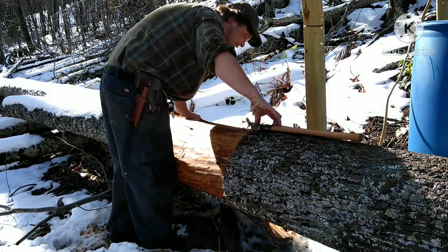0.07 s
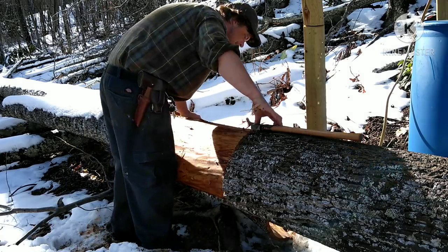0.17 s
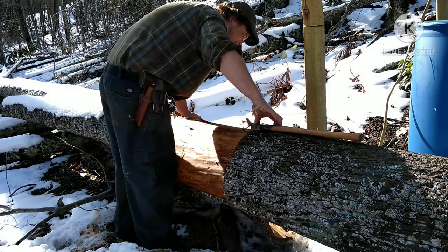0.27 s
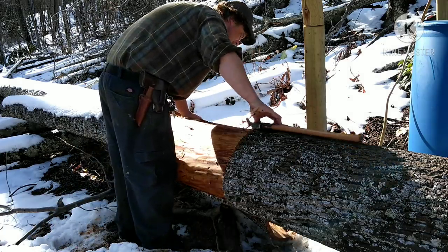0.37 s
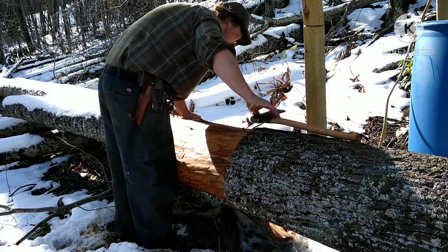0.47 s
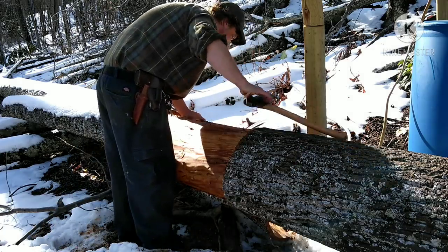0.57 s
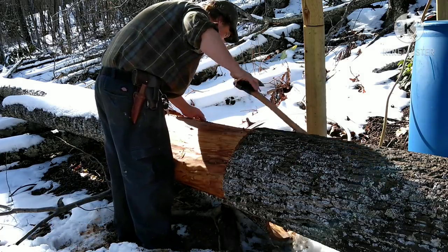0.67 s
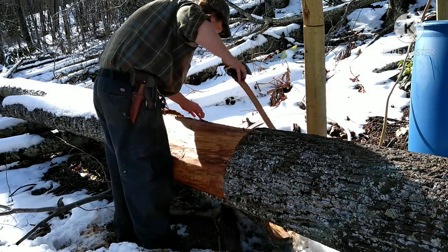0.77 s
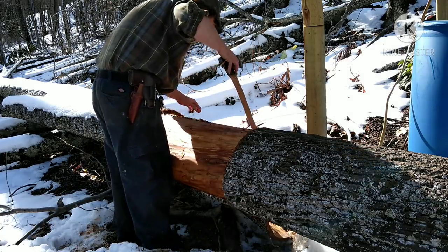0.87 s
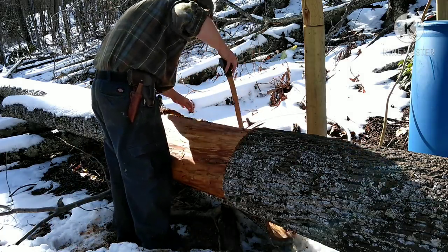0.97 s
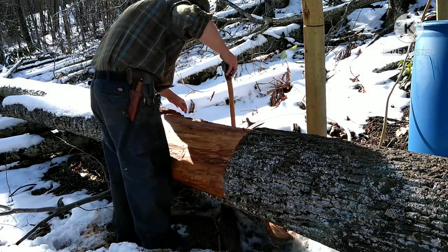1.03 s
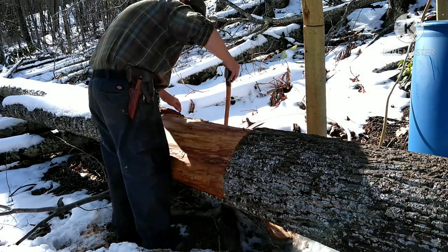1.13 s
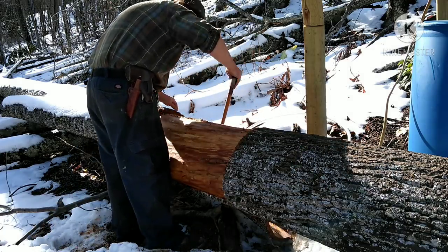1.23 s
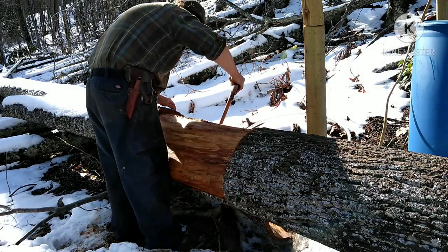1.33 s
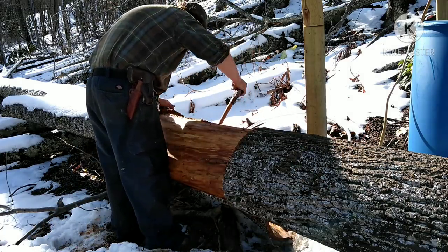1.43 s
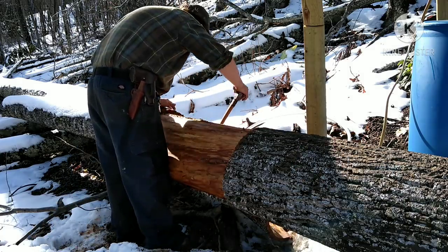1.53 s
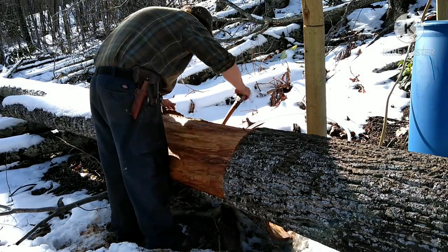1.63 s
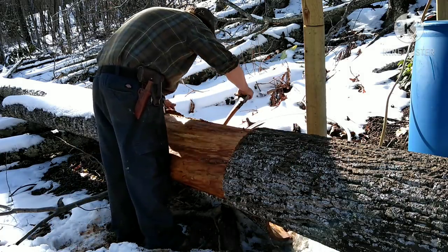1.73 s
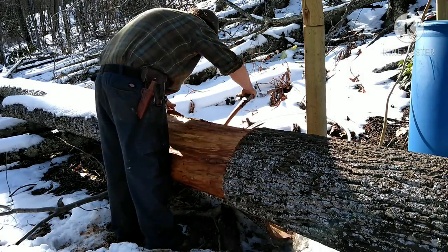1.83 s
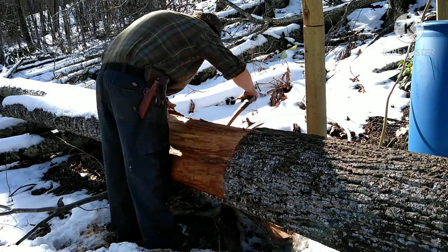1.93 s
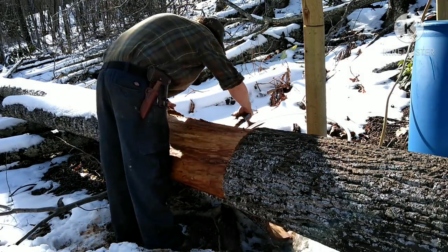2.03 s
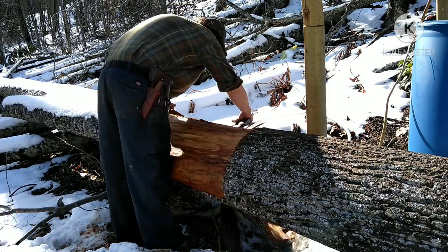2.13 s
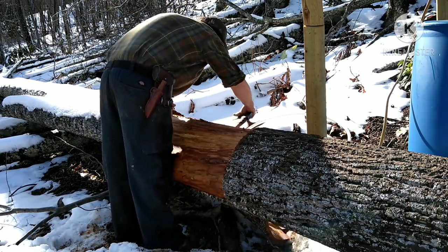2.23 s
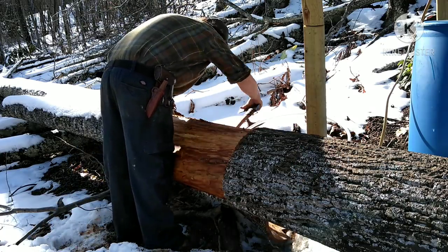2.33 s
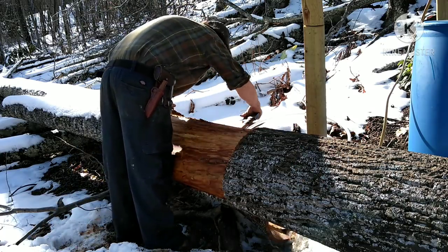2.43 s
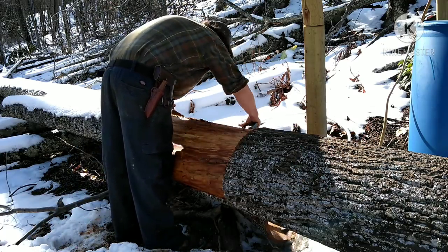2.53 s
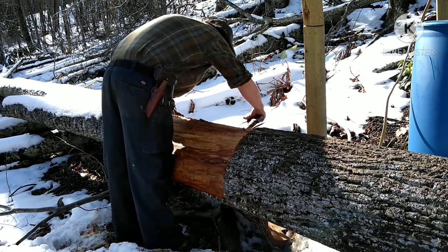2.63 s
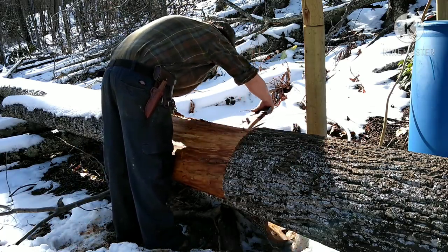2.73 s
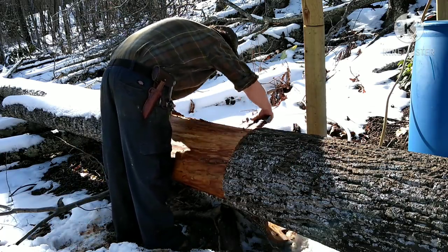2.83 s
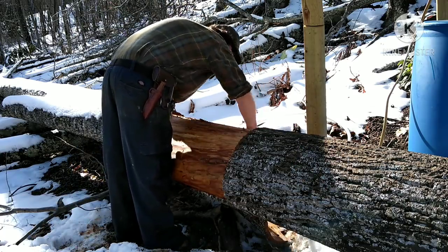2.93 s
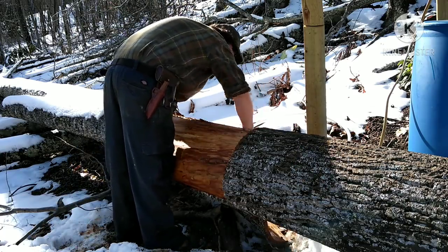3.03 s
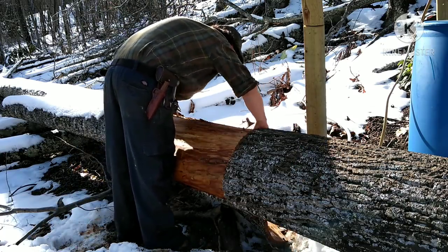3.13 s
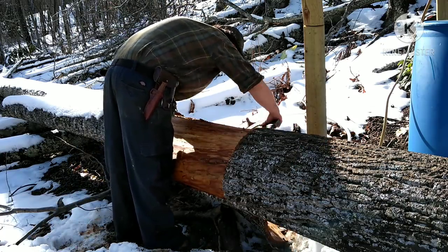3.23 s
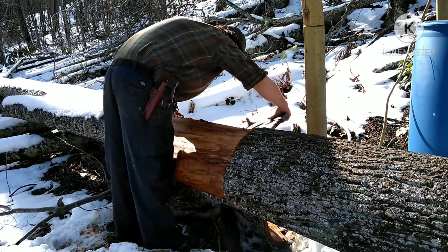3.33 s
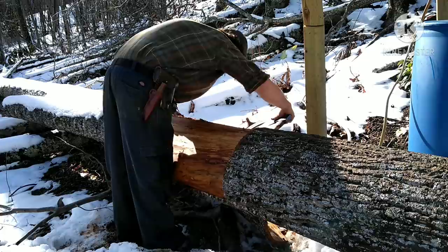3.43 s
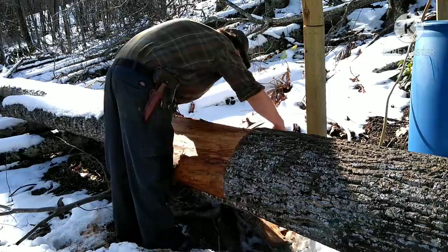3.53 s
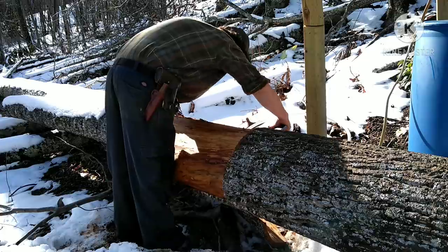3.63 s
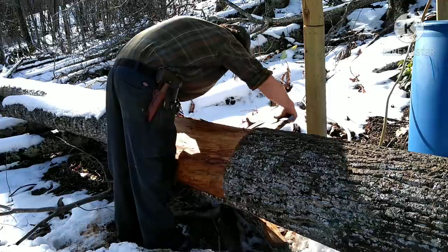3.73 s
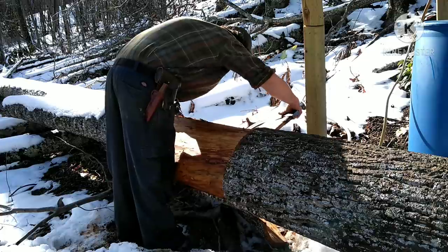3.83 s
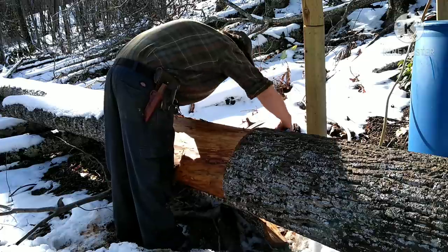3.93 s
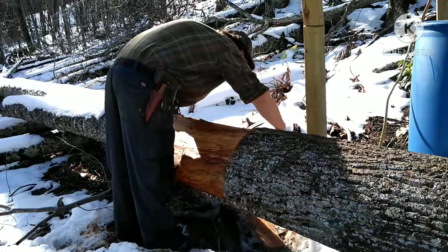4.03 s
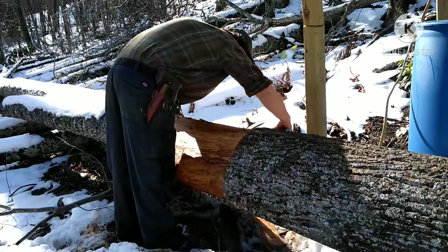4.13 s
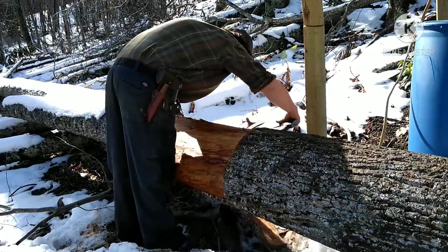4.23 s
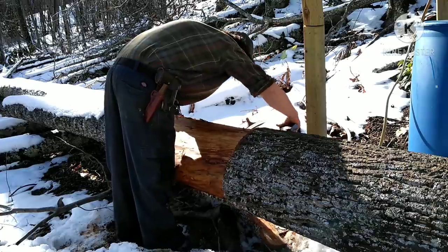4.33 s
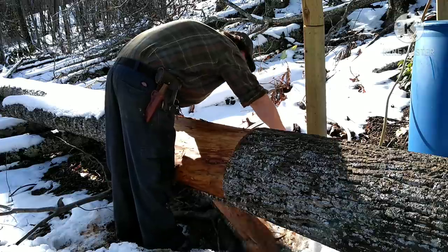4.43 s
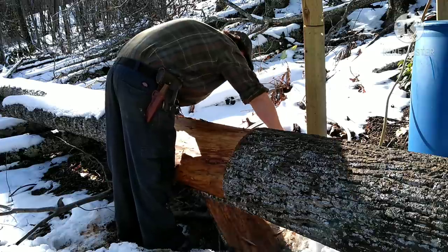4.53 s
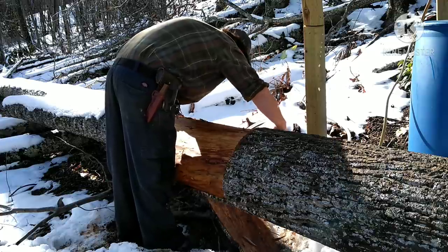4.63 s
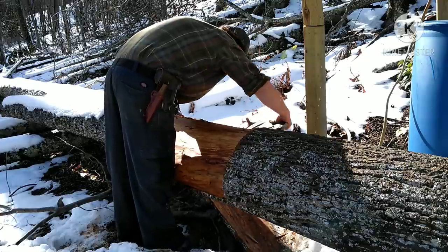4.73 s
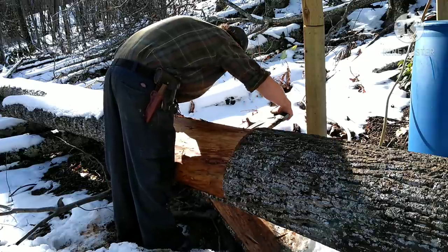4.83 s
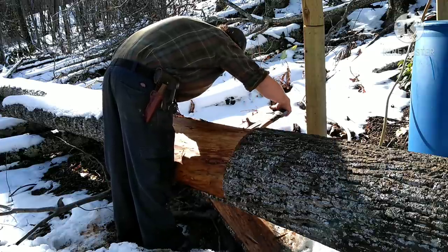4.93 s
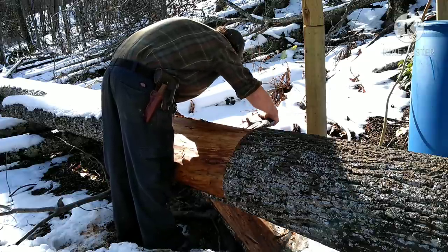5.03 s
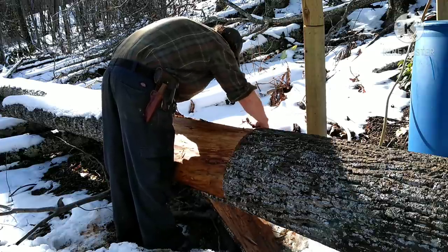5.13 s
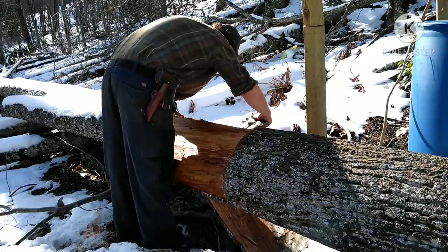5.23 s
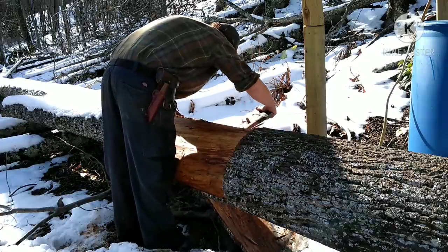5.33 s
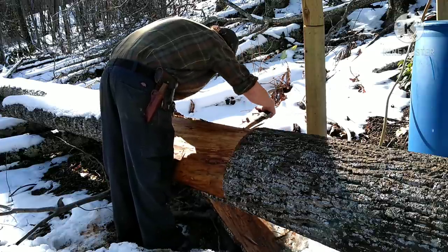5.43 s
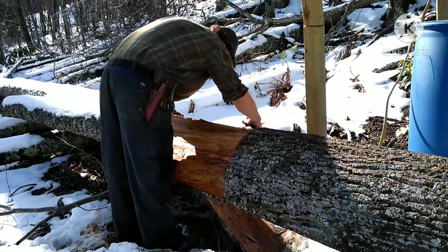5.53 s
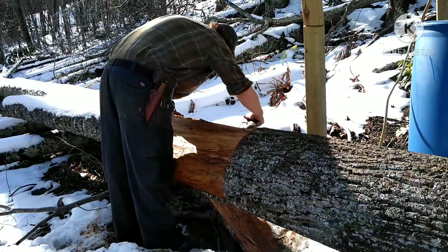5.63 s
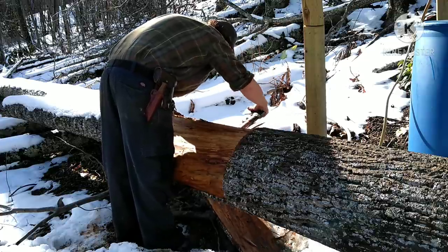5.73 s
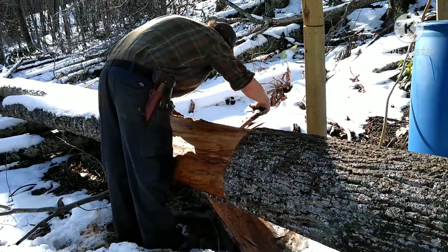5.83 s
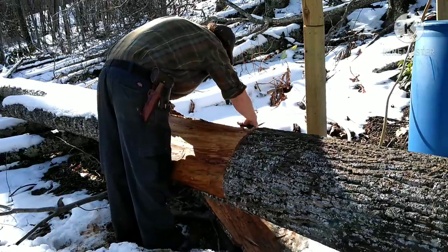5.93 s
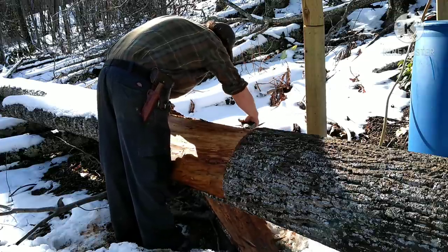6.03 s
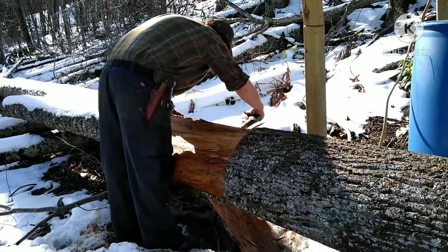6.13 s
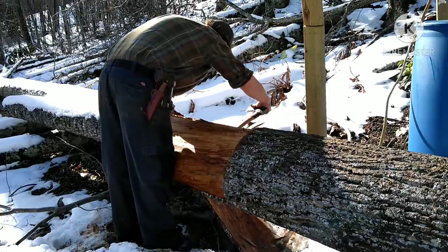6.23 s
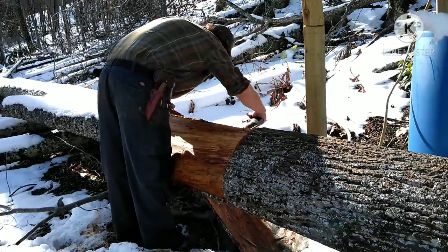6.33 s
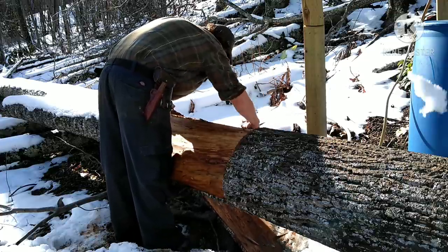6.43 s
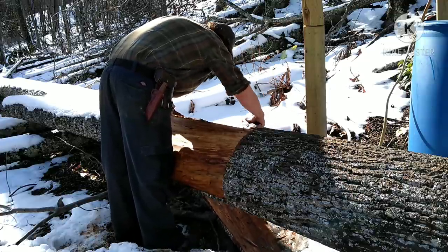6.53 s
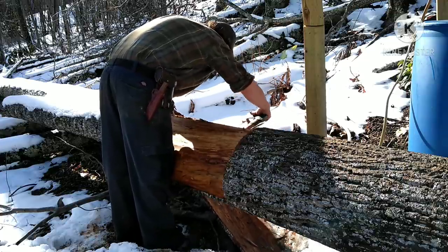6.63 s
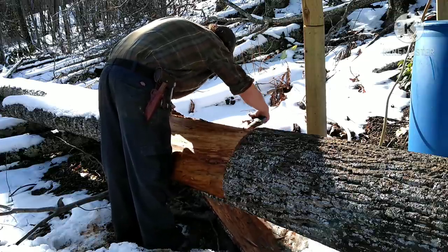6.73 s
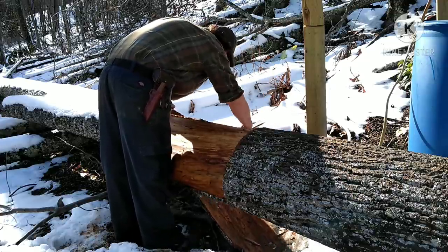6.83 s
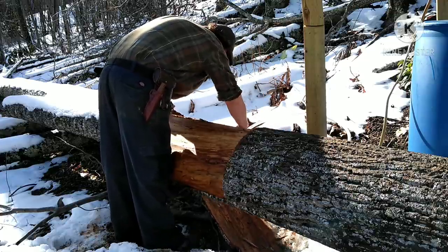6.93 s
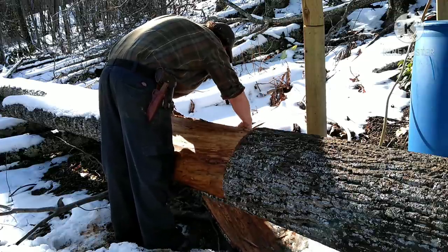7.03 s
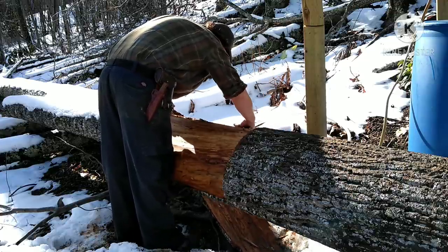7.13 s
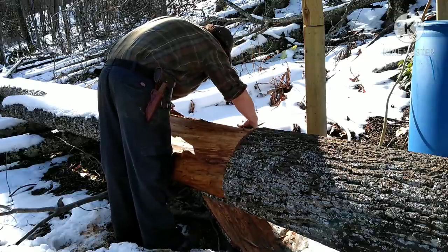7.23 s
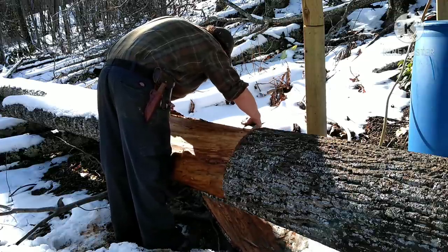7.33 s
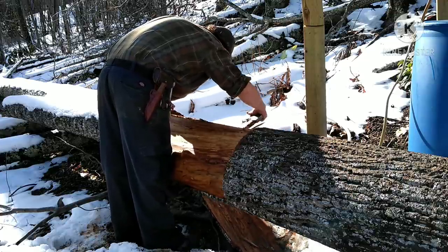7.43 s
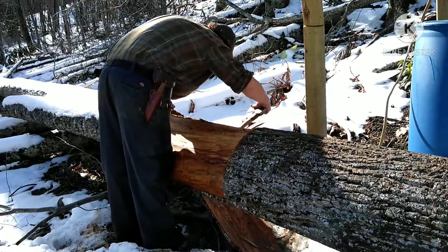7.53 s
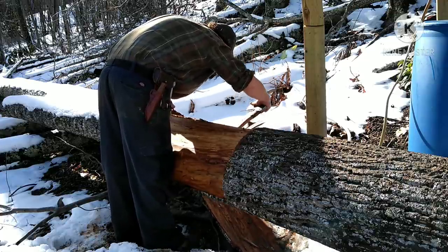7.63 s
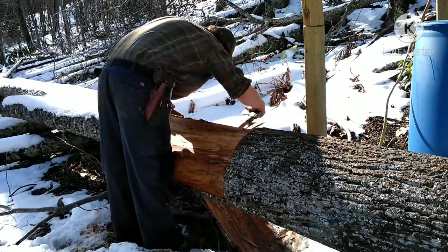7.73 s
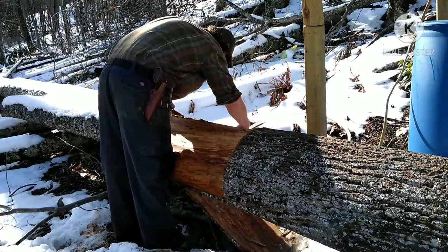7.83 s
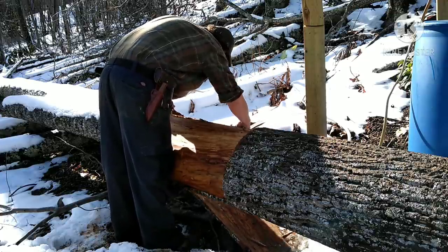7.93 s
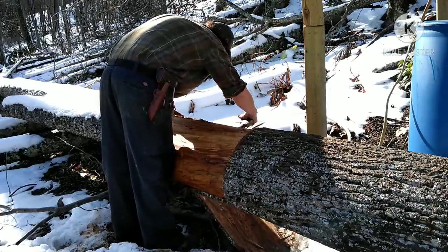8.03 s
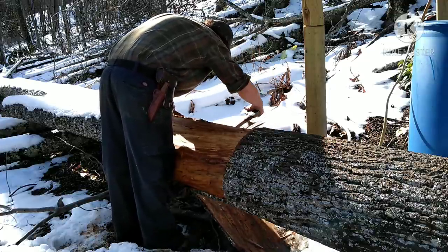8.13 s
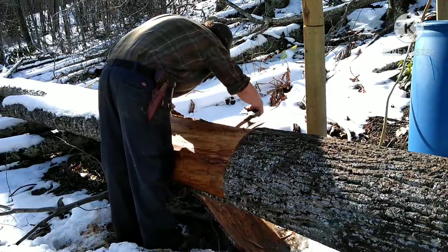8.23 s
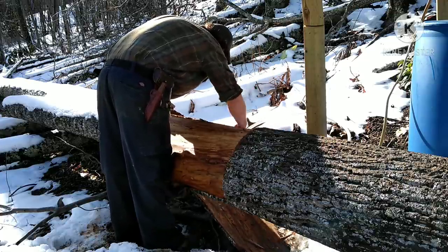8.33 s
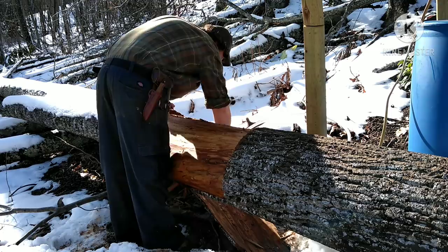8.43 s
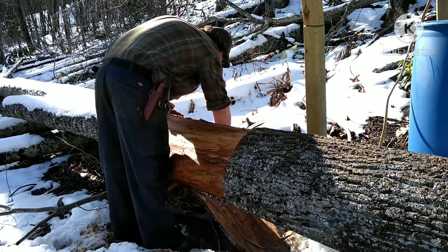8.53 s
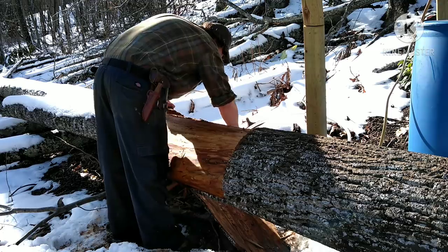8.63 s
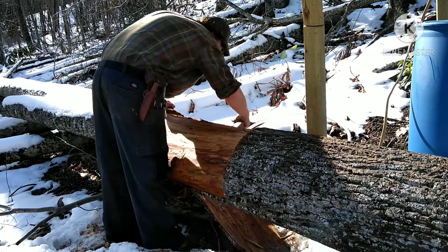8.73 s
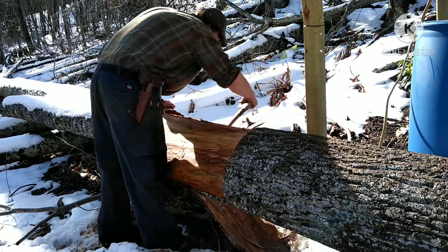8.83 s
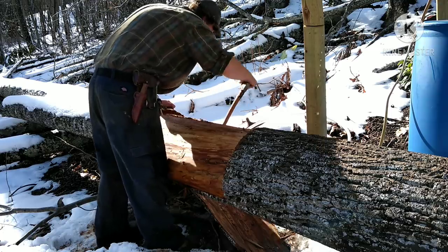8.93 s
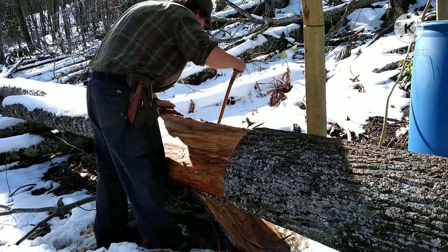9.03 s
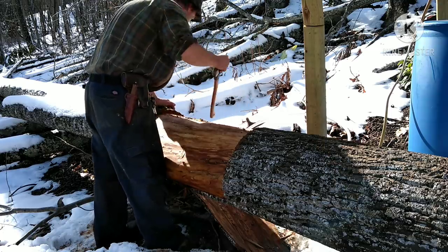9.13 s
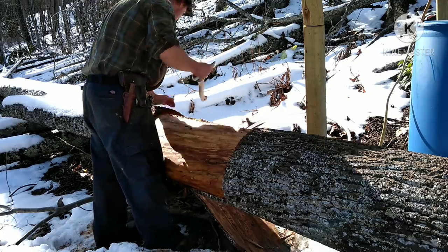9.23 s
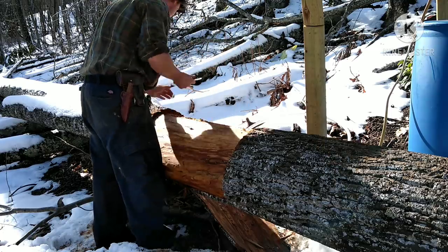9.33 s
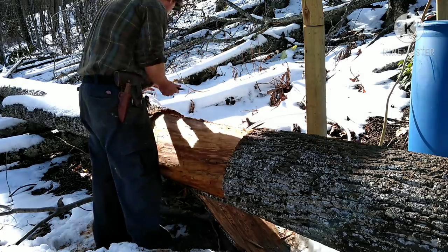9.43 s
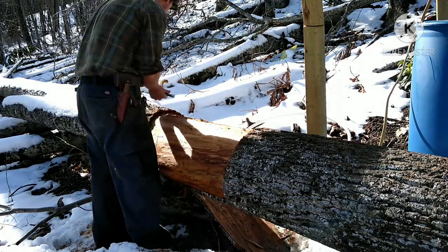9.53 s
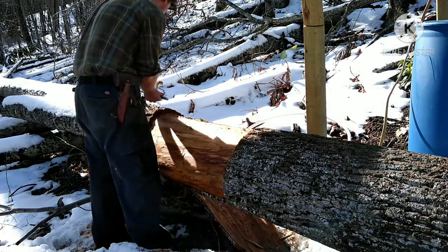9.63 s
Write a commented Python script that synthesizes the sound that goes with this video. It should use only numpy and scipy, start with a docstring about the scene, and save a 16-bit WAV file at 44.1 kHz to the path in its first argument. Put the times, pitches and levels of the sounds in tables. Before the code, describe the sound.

An iron tool jabs under log bark outdoors, with wooden handle knocks, dull thuds, scraping and sharp crackling snaps.

```python
"""A winter wood: a wooden-handled peeling iron is jabbed again and again under the bark of a felled log.
Over soft outdoor air and rustle, the blade slides in stick-slip and rings on hard spots; fibres tear
with a bright crackle and bark snaps. The handle knocks and rattles, the loosening slab thuds.
A small camera's two close capsules hear it; delayed cross-subtraction widens the image."""
import sys
import numpy as np
from scipy import signal
from scipy.fft import rfft, irfft
from scipy.io import wavfile
from scipy.ndimage import uniform_filter1d

SR = 44100
rng = np.random.default_rng(int(sys.argv[2]) if len(sys.argv) > 2 else 0)


def materialize(psi):
    """Save the field psi as 16-bit PCM at rate SR to the path in sys.argv[1].

    A 1-D psi becomes a single channel; in a 2-D psi each row is a channel.
    """
    bounded = np.clip(np.atleast_2d(psi).T, -1, 1)
    quanta = np.round(bounded * 32767).astype(np.int16)
    wavfile.write(sys.argv[1], SR, quanta)


N = 427329

# handle modes: pitch_hz
HANDLE_HZ = [261, 545, 775, 824, 1000, 1115, 1255, 1422, 1595, 1710, 2038, 2710, 3115, 3950, 5170]
# ring of each handle mode: level_db, base_t60_s
HANDLE_RING = [(3, 0.22), (-1, 0.057), (-4.5, 0.048), (-2, 0.12), (-2.5, 0.023), (-10, 0.029), (-5, 0.035),
               (2, 0.038), (-10, 0.12), (1.5, 0.031), (3, 0.016), (-6, 0.04), (-15, 0.062), (0, 0.0082),
               (-52, .03)]
HANDLE_MODES = np.column_stack([HANDLE_HZ, HANDLE_RING])
# slab and log modes: pitch_hz, level_db, base_t60_s
SLAB_MODES = [(60.3, 19, 0.2), (85, 11.5, 0.1), (123, -25, 0.073), (158.4, 8.5, 0.18), (205.4, 0.5, 0.13),
              (255.5, 3.5, 0.2), (327, 0.5, 0.092), (370, 1, 0.16), (430.6, 10.5, 0.14), (474, -6.5, 0.12),
              (572, 3, 0.098), (624, 4, 0.14), (700, -30, 0.033), (862, 8.5, 0.083), (1168, -6.5, 0.066)]
# jabs that ram home: start_s, level_db, favoured_hz, rebound_after_ms, rebound_db, rebound_hz
JABS = [(2.1712, -4, 430, 29, -11.5, 144), (2.594, -1, 190, 24, -9, 216), (2.989, -2.5, 560, 29, -11, 200),
        (3.6224, -4, 408, 19.8, -12.5, 205), (4.071, -3.5, 570, 11, -11.5, 234),
        (4.4982, -4, 534, 16.8, -12.5, 490), (5.196, -4, 307, 28, -17, 325),
        (5.6152, -4.5, 345, 21, -13, 148), (6.047, -6, 380, 22, -23, 214),
        (6.486, -3.5, 446, 17.5, -16, 233), (6.9139, -4, 418, 27, -18, 210), (7.908, -4, 356, 37, -11, 148)]


def amp(db):
    return 10 ** (np.asarray(db) / 20)


def unit_rms(x):
    return x / np.sqrt(np.mean(x ** 2) + 1e-20)


def at_hz(points, hz):
    points_hz, values = np.transpose(points)
    return np.interp(np.log(hz + 1), np.log(points_hz + 1), values)


def at_time(points, time_s):
    return np.interp(time_s, *np.transpose(points))


def filtered(x, gain_at_hz):
    n = x.shape[-1]
    return irfft(rfft(x) * gain_at_hz(np.fft.rfftfreq(n, 1 / SR)), n)


def delayed(x, delay_ms):
    return filtered(x, lambda hz: np.exp(-2j * np.pi * hz * delay_ms / 1000))


def add(mix, start_s, sound):
    part = mix[:, max(round(start_s * SR), 0):][:, :sound.shape[1]]
    part += sound[:, :part.shape[1]]


def ringing(modes, t, weight_db=0., t60_scale=1, pitch_scale=1):
    """Impulse response of decaying modes."""
    hz, level_db, t60_s = np.transpose(modes)[:, :, None]
    envelope = amp(level_db + weight_db - 60 * t / (t60_s * t60_scale))
    return (envelope * np.sin(2 * np.pi * hz * pitch_scale * t)).sum(0)


def add_strike(mix, start_s, peak_db, drive, response, base_lag_ms=0.098):
    """One blow at both capsules; the path round the log shifts and colours the right one."""
    # path to the right capsule: freq_hz, gain_db, lag_factor
    path = [(60, -3, .3), (150, 1.5, 0.34), (310, 4, 1.4), (570, -2, 2.84), (1010, -15.5, 0.35),
            (2100, 2, 0.45), (3700, -8.5, 0.41)]
    path_hz, gain_db, lag_factor = np.transpose(path)

    def path_gain(hz):
        lag_ms = base_lag_ms * np.interp(hz, path_hz, lag_factor)
        return amp(np.interp(hz, path_hz, gain_db)) * np.exp(-2j * np.pi * hz * lag_ms / 1000)

    left = signal.fftconvolve(drive, response)
    left = np.pad(amp(peak_db) * left / abs(left).max(), 64)
    add(mix, start_s - 64 / SR, np.array([left, filtered(left, path_gain)]))


def noise_bed(spectrum, coherence_at_hz, patch_db, flicker_db):
    """Stereo noise with drifting patches and a flicker common to all bands."""
    frames, hz = N // 128 + 5, np.fft.rfftfreq(512, 1 / SR)
    left_re, left_im, own_re, own_im, patches = rng.standard_normal((frames, 257, 5)).T
    patches = unit_rms(uniform_filter1d(uniform_filter1d(patches, 8, 0), 20, 1))
    spikes = np.minimum(rng.exponential(1, frames), 3.5) ** 2
    flicker = unit_rms(uniform_filter1d(spikes, 4) - 2)
    coherence = coherence_at_hz(hz)[:, None]
    left = left_re + 1j * left_im
    right = coherence * left + np.sqrt(1 - coherence ** 2) * (own_re + 1j * own_im)
    gain = amp(at_hz(spectrum, hz)[:, None] + patch_db * patches + flicker_db * flicker)
    return unit_rms(signal.istft(np.array([left, right]) * gain, nperseg=512, noverlap=384)[1][:, :N])


def outdoor_air():
    """Low air noise; it swells briefly round each jab as log and snow shudder."""
    # air level: time_s, level_db
    levels = [(0.0, -46.5), (0.59, -42), (1.19, -44), (1.8, -43.5), (2.1, -39.5), (3.1, -40), (3.43, -51),
              (3.75, -45), (4.94, -48.5), (5.4, -45.5), (5.86, -48), (6.4, -42), (7.18, -46), (7.77, -45.5),
              (8.3, -41.5), (8.6, -43), (9.69, -45.5)]
    # air spectrum: freq_hz, density_db
    spectrum = [(25, -27), (50, 8), (100, 7.5), (200, 4), (400, -1.5), (800, -12), (1500, -21.5),
                (2500, -25.5), (5000, -36)]
    # likeness of the capsules: freq_hz, coherence
    coherence = [(60, 0.77), (200, 0.97), (600, 0.21), (1500, 0.029), (4000, .05)]
    t = np.arange(N) / SR
    shudder = sum(amp(db - 30.5) * np.exp(-abs(t - jab_s) / 0.03) for jab_s, db, *_ in JABS)
    bed = noise_bed(spectrum, lambda hz: at_hz(coherence, hz), patch_db=1.7, flicker_db=1.14)
    return (amp(at_time(levels, t)) + shudder) * amp(7.5) * bed


def rustle():
    """Dry hiss of bark crumbs and clothes."""
    # rustle level: time_s, level_db
    levels = [(0.0, -52), (0.51, -47), (1.83, -51), (2.97, -51), (3.43, -58.5), (4.18, -54.5), (5.5, -57),
              (6.53, -53.5), (6.75, -58), (6.93, -41.5), (7.26, -54.5), (7.83, -56), (8.02, -48),
              (8.31, -54), (8.83, -50), (9.5, -54), (9.69, -55.5)]
    # rustle spectrum: freq_hz, density_db
    spectrum = [(500, -2), (1500, 11), (3000, 4), (4500, 1.5), (6500, 5.5), (9000, 7), (11500, 8),
                (13000, 3.5), (14500, -3.5)]
    bed = noise_bed(spectrum, lambda hz: np.full_like(hz, 0.034), patch_db=2.5, flicker_db=1.03)
    return amp(at_time(levels, np.arange(N) / SR) + 3.5) * bed


def wood_scatter(direct, t60_s=0.077):
    """Faint short return from snow, log and trees, different at each capsule."""
    t = np.arange(6000) / SR
    response = rng.standard_normal((2, 6000)) * amp(-60 * t / t60_s) * (t > .002)
    response /= np.linalg.norm(response[0])
    return amp(-17.5) * signal.fftconvolve(direct, response, axes=1)[:, :N]


def blade_slide(slips_per_s=500):
    """Stick-slip between bark and wood: small random slips ring handle and slab."""
    # blade strokes: middle_s, half_length_s, level_db
    strokes = [(0.037, 0.17, -33), (.8, 0.97, -34), (2.1, 0.11, -34), (2.377, 0.29, -24.5),
               (2.84, 0.13, -18.5), (3.39, 0.16, -27), (3.816, 0.15, -26.5), (4.532, 0.15, -23.5),
               (5.04, 0.71, -37), (5.783, 0.17, -28.5), (6.23, 0.26, -27), (6.675, 0.16, -26),
               (7.61, 0.28, -35.5), (8.04, 0.24, -28.5), (8.322, 0.22, -29), (8.9, 0.55, -34.5),
               (9.468, 0.091, -18)]
    t = np.arange(N) / SR
    slips = (rng.random(N) < slips_per_s / SR) * rng.standard_normal(N)
    slips *= amp(3.1 * np.minimum(rng.exponential(1, N), 2.5))
    handle = unit_rms(ringing(HANDLE_MODES, t[:5000], t60_scale=0.97))
    slab = unit_rms(ringing(SLAB_MODES, t[:5000], t60_scale=0.23))
    swell = sum(amp(db - 18 * abs(t - middle_s) / half_s) for middle_s, half_s, db in strokes)
    scrape = swell * amp(-8.5) * unit_rms(signal.oaconvolve(slips, handle + 3.5 * slab)[:N])
    return np.array([scrape, delayed(scrape, delay_ms=0.034)])


def fibre_tears(faint_count=30, rise_ms=1.38):
    """Bursts of tiny snaps of very unequal size; each capsule hears partly different ones."""
    # tearing fibres: start_s, level_db, decay_s, tilt_db_per_octave, right_trim_db
    tears = [(0.2415, -22.5, 0.034, 12.5, -9), (0.4122, -31.5, 0.065, 0.5, -2), (0.4903, -27, 0.13, 9, -6),
             (0.5029, -26.5, 0.48, 1.5, -16), (0.59, -28.5, 0.1, 8, -7), (0.7672, -23, 0.038, 8, -0.5),
             (1.0388, -32, 0.3, -3, -5), (1.215, -29.5, .12, 12, -4), (1.284, -31, .13, 9, -3),
             (1.3495, -36, 0.22, 0.5, 6.5), (1.823, -28, .066, 18, -6), (1.9147, -33, 0.068, 2, 0.5),
             (1.963, -32.5, 0.036, 2, -2.5), (2.0423, -28, 0.15, -6, 7), (2.146, -22, 0.15, -6.5, .1),
             (2.173, -12.5, 0.072, 3, -5), (2.2205, -26.5, 0.14, 3, 0), (2.353, -31.5, .09, 6, -2),
             (2.4124, -20, 0.052, -6, -5), (2.561, -24, 0.1, -4.5, 0), (2.5948, -17.5, 0.089, 5.5, -8),
             (2.6414, -25.5, 0.073, 2.5, -3), (2.882, -31, .079, 11, -5), (2.9502, -32, .099, -3, 4),
             (2.9682, -23, 0.16, -6, 3), (2.9916, -13.5, 0.11, 2, -5.5), (3.044, -24.5, .06, -1.5, -2),
             (3.0754, -29, 0.13, -1.5, -5), (3.418, -29.5, 0.063, 17, -5), (3.6222, -13.5, .12, 2, -7.5),
             (3.682, -28.5, 0.13, 4, -4), (3.955, -34, .04, 13, -5), (4.0714, -16, 0.17, -1, -15),
             (4.099, -25.5, 0.19, 9, -4), (4.4953, -15.5, 0.081, -4.5, -1), (4.4992, -26.5, 0.23, 3, -7),
             (4.548, -27.5, 0.29, 5, -6), (5.033, -33, 0.027, 15, -5), (5.1927, -27.5, 0.2, 4, -8),
             (5.397, -36, 0.022, 7, -2), (5.573, -32, 0.044, 16, -8), (5.6217, -20, 0.084, 1, 4.5),
             (5.6293, -7, 0.079, 3.5, -9), (5.7814, -26, 0.036, 5.5, -5), (6.0277, -21.5, 0.2, -4.5, 0.5),
             (6.0542, -16.5, 0.089, 1, -9), (6.4945, -9, 0.095, 2, -2), (6.568, -26, 0.3, 0, -10.5),
             (6.6478, -27.5, 0.072, 6, -8), (6.7476, -10.5, 0.13, 6.5, -4.5), (6.852, -30.5, 0.21, 7, -7),
             (6.8823, -18, 0.2, 14, -5), (6.8899, -19.5, 0.26, 0.5, -9), (6.914, -15, 0.24, 1.5, -18),
             (6.9351, -10.5, .06, 5.5, -3.5), (7.011, -26, .1, 2, -14), (7.0379, -24, 0.57, 3.5, -6),
             (7.1935, -28, 0.12, 14, -6), (7.2774, -31.5, 0.11, 12, -6), (7.5544, -32, .14, -3.5, -3),
             (7.745, -22.5, 0.028, 22, -6), (7.9065, -14.5, 0.22, -1.2, -2.5),
             (7.9344, -12.5, 0.13, 9, -12), (8.29, -32.5, .11, 13, -5), (8.4168, -28.5, 0.088, -3, 1.5),
             (8.438, -27, 0.24, 4.5, -8), (8.538, -30, 0.15, 3.5, -8), (8.565, -31, 0.046, 6, -4),
             (8.6438, -31, 0.046, 10, -1.5), (8.8367, -25, 0.076, 20, -5), (9.039, -31, 0.044, 19, -1.5),
             (9.223, -30.5, .088, 9, -11), (9.3801, -33, 0.49, 5, -6), (9.4423, -30, 0.25, 3, -2)]
    # tear spectrum: freq_hz, density_db
    spectrum = [(300, 11.5), (1500, 11), (3000, 7), (4500, 4), (6500, 4), (9000, 6), (11500, 4.5),
                (13000, 0), (14500, -13)]
    mix, t = np.zeros((2, N)), np.arange(8192) / SR
    # faint extra tears at random times, scattered in level and side
    faint = [-39, 0.074, 8.5, -5.5] - rng.standard_normal((faint_count, 4)) * [6, 0, 0, 6]
    rows = [*tears, *np.column_stack([rng.random(faint_count) * N / SR, faint])]
    noises = rng.standard_normal((len(rows), 2, len(t)))
    for (start_s, level_db, decay_s, tilt_db, right_trim_db), noise in zip(rows, noises):
        size_db = 1.8 * np.minimum(rng.exponential(1, len(t) // 32), 4)
        snaps = noise * amp(np.repeat(size_db, 32))
        snaps[1] = 0.13 * snaps[0] + 1.47 * snaps[1]
        crackle = filtered(
            snaps, lambda hz: amp(at_hz(spectrum, hz) + tilt_db * np.log2(hz / 7000 + 0.023)))
        attack = (1 - np.exp(-t * 1000 / rise_ms)) ** 2
        envelope = attack * amp(-60 * (t / min(decay_s, .5)) ** 0.87)
        burst = unit_rms(crackle) * envelope / envelope.max()
        add(mix, start_s, amp(level_db - 5) * burst * amp([[0], [right_trim_db]]))
    return mix


def bark_snaps():
    """Dry bark breaks: a click a couple of cycles long, then smaller splinters."""
    # single snaps: start_s, peak_db, centre_hz
    snaps = [(.243, -23, 7000), (.503, -20.5, 4000), (0.617, -37, 3000), (.77, -26, 8000),
             (2.177, -13, 8000), (2.994, -20, 8000), (3.42, -36, 9000), (3.624, -22, 7000),
             (4.501, -11, 4000), (5.398, -38, 7500), (5.783, -39, 6000), (6.497, -4, 5000),
             (6.75, -18, 9000), (6.759, -20, 9000), (8.839, -21, 9000)]
    mix, t = np.zeros((2, N)), np.arange(300) / SR
    for start_s, peak_db, centre_hz in snaps:
        splinters = 0.11 * rng.standard_normal(300) ** 3 * np.exp(-t / 0.00084)
        splinters[0] = 1
        click = np.sin(2 * np.pi * centre_hz * t) * np.exp(-1.6 * centre_hz * t)
        add_strike(mix, start_s, peak_db, splinters, click)
    return mix


def blade_rings():
    """Bare steel chatters on something hard, ringing the modes nearest the favoured pitch."""
    # blade modes: pitch_hz, level_db, t60_s
    modes = [(1630, -3.5, 0.066), (2670, -13, 0.044), (3074, -10.5, 0.058), (3958, -8, 0.014),
             (5230, -28, 0.081)]
    # hard touches: start_s, peak_db, favoured_hz, chatter_ms
    touches = [(1.35, -22, 3300, 0.73), (2.413, -30, 3150, 2), (2.562, -29, 2750, 2.7),
               (2.95, -26, 3130, 2), (3.076, -16, 3160, 2), (3.622, -20, 3130, 2.9),
               (4.032, -33, 3130, 3.1), (4.073, -19, 3000, 3), (4.246, -31, 3170, 1.8),
               (4.452, -38, 3130, 5), (4.484, -19, 1600, 2.3), (4.5, -20, 3100, 3.4), (4.885, -42, 2900, 2),
               (5.163, -30.5, 2900, 4.8), (5.194, -28, 2900, 2), (5.447, -46, 3130, 2.4),
               (5.567, -33, 3130, 3), (5.615, -29, 3130, 2), (6.028, -29.5, 3130, 2.5),
               (6.428, -33, 3000, 5), (6.492, -10, 3130, 2.1), (7.552, -16, 2080, 1.3),
               (7.849, -36, 3130, 9.8), (7.907, -17, 3720, 2), (8.149, -24, 2160, 2),
               (8.228, -36, 3130, 2.4), (8.371, -34, 3000, 5), (8.406, -28, 1600, 2),
               (8.418, -24, 3000, 2.5), (8.714, -41, 3130, 1.5)]
    mix, t = np.zeros((2, N)), np.arange(6000) / SR
    mode_hz = np.array(modes)[:, :1]
    for start_s, peak_db, favoured_hz, chatter_ms in touches:
        chatter = rng.standard_normal(800) ** 3 * np.exp(-t[:800] * 1000 / chatter_ms)
        blade = ringing(modes, t, weight_db=-12 * abs(np.log2(mode_hz / favoured_hz)))
        add_strike(mix, start_s, peak_db, chatter, blade)
    return mix


def handle_knocks(rattle_rise_ms=3.18, graze_samples=100):
    """A firm contact and a quick rattle ring the handle; longer contact is duller."""
    # tool knocks: start_s, level_db, favoured_hz, contact_ms, rattle_ms
    knocks = [(.384, -28, 700, 0.37, 1.5), (0.5, -25, 810, 0.39, 3.8), (0.544, -25.5, 784, 0.26, 4.7),
              (0.615, -21, 1410, 0.35, 4.8), (1.943, -16, 1050, 0.47, 1.44), (1.947, -15, 1530, 0.39, 4.6),
              (2.039, -14.5, 1050, 0.58, 1.8), (2.044, -12, 1550, 0.44, 3), (2.064, -23, 1050, 0.33, 3),
              (2.07, -17.5, 1550, 0.97, 3.3), (2.121, -24, 781, 0.31, 10), (2.142, -22, 800, 0.31, 1.5),
              (2.147, -16, 807, 0.32, 2.5), (2.169, -13, 800, .4, 2.3), (2.173, -3, 1380, 0.14, 5.3),
              (2.222, -24, 727, .28, 4), (2.318, -28, 829, 0.21, 7.6), (2.408, -19.5, 821, 0.28, 5.9),
              (2.442, -19.5, 816, 0.25, 7.5), (2.524, -27, 821, 0.16, 18), (2.56, -26, 818, 0.16, 2.7),
              (2.586, -13, 1700, 0.46, 4.3), (2.591, -9.5, 1330, 0.24, 17), (2.762, -21, 824, 0.47, 4.5),
              (2.787, -24.5, 826, 0.37, 2.9), (2.821, -23, 703, 0.16, 2.2), (2.832, -32, 1400, .25, 5),
              (2.862, -17.5, 780, 0.34, 9.2), (2.884, -19, 770, 0.2, 6.3), (2.9, -21.5, 800, .3, 2.4),
              (2.952, -18, 824, 0.23, 3.5), (2.965, -16, 800, 0.33, 1.4), (2.969, -15, 1100, 0.18, 6),
              (2.992, -3.5, 950, 0.22, 3.4), (3.074, -17, 1100, 0.53, 1.7), (3.077, -1, 1320, 0.27, 4.8),
              (3.103, -10, 1350, 0.38, 9.1), (3.118, -19, 1340, 0.3, 9.9), (3.352, -23, 825, 0.44, 7.1),
              (3.414, -28.5, 780, 0.41, 2.9), (3.581, -22.5, 708, 0.18, 26), (3.612, -13.5, 700, 0.35, 1.5),
              (3.617, -7, 1460, 0.21, 2), (3.623, -7, 1040, 0.12, 8.9), (3.709, -24.5, 729, 0.53, 18),
              (3.769, -28.5, 800, .16, 5.5), (3.836, -26.5, 797, 0.71, 16), (3.902, -25, 834, 0.39, 3.9),
              (4.001, -28.5, 786, 0.17, 29), (4.029, -22, 600, .4, 2.5), (4.033, -14, 845, .18, 21),
              (4.061, -17, 703, 0.099, 2.1), (4.066, -11, 800, 0.35, 2.9), (4.071, -14, 734, 0.17, 5.5),
              (4.243, -8, 900, 0.44, 8), (4.267, -15, 806, 0.63, 10), (4.365, -27.5, 810, 0.66, 8.1),
              (4.446, -29, 815, 0.3, 11), (4.482, -20, 800, 0.25, 2), (4.487, -16, 1400, 0.32, 6.8),
              (4.498, -3, 745, 0.3, 4.9), (4.737, -24.5, 770, 0.13, 3), (4.783, -28, 767, 0.46, 5.2),
              (4.849, -10.5, 840, 0.42, 3.8), (4.872, -14, 1400, 0.56, 5), (4.886, -19.5, 1500, 0.32, 11),
              (4.921, -22, 825, 0.34, 6.6), (5.132, -22.5, 600, 0.33, 3), (5.141, -21.5, 703, 0.28, 13),
              (5.16, -17, 800, .3, 3), (5.168, -21, 800, 0.4, 7.3), (5.183, -25, 1400, .3, 3),
              (5.163, -20.5, 1600, 0.34, 12), (5.191, -24, 856, 0.15, 9.1), (5.219, -21, 890, 0.24, 3.1),
              (5.417, -25.5, 730, 0.99, 4.7), (5.433, -27, 756, 0.36, 17), (5.566, -29, 732, .15, 5.5),
              (5.583, -16.5, 805, 0.27, 5.7), (5.591, -13.5, 820, 0.2, 3.3), (5.613, -21, 700, 0.35, 1.4),
              (5.616, -8.5, 750, 0.14, 6), (6.005, -22.5, 773, 0.47, 7.1), (6.026, -13.5, 800, 0.4, 2.6),
              (6.029, -10.5, 1700, .18, 1.7), (6.143, -20, 850, 0.099, 21), (6.233, -35, 800, 0.28, 10),
              (6.289, -23, 770, 0.61, 9.5), (6.429, -27, 1390, 0.17, 8.3), (6.455, -12, 703, 0.36, 4),
              (6.466, -12.5, 825, 0.24, 6.1), (6.485, -14, 918, 0.12, 4), (6.499, -7, 2038, 0.16, 3.5),
              (6.495, -2, 2050, 0.35, 2.5), (6.583, -20, 830, 0.24, 1.8), (6.75, -25.5, 767, 0.31, 1.8),
              (6.876, -18.5, 860, 0.2, 2.9), (6.884, -20.5, 818, .21, 4.1), (6.91, -11, 1050, 0.14, 6),
              (7.551, -14.5, 790, 0.32, 0.94), (7.554, -8.5, 1510, 0.25, 1.1),
              (7.616, -31.5, 783, 0.36, 6.3), (7.859, -25.5, 794, 0.16, 3.3), (7.874, -19, 794, 0.25, 3.9),
              (7.897, -11, 861, 0.2, 6.3), (7.941, -17, 703, 0.27, 4.3), (8.149, -13.5, 800, 0.65, 0.9),
              (8.153, -8, 1610, 0.27, 2.4), (8.226, -18.5, 800, 0.33, 7.4), (8.27, -29.5, 807, 0.37, 16),
              (8.376, -25, 810, 0.34, 18), (8.404, -17.5, 800, 0.4, 3.3), (8.416, -10.5, 790, 0.52, 24),
              (8.91, -25.5, 780, 1, 6.7), (9.442, -26, 1000, 0.51, 15)]
    # looseness of the hand: time_s, t60_factor
    grip = [(0, 1.8), (3.0, 1.13), (3.07, 0.65), (3.95, 1), (4.2, 0.92), (7.0, 0.94), (7.5, 1.48),
            (9.69, 0.58)]
    mix, t = np.zeros((2, N)), np.arange(6000) / SR
    t_ms, mode_hz = t[:2000] * 1000, HANDLE_MODES[:, :1]
    for start_s, level_db, favoured_hz, contact_ms, rattle_ms in knocks:
        envelope = np.exp(-t_ms / rattle_ms) * np.minimum(t_ms / rattle_rise_ms, 1) ** 2
        rattle = 0.29 * rng.standard_normal(2000) ** 3 * envelope
        rattle[graze_samples] += 0.74  # firm contact
        push = np.exp(-.5 * ((t_ms[:200] / contact_ms - .5) / 0.17) ** 2)
        drive = np.convolve(rattle, push)
        lag_ms = 0.098 * rng.normal(1, 0.91)
        # grip and contact point change which modes sound
        weight_db = -8 * abs(np.log2(mode_hz / favoured_hz)) + rng.normal(0, 2.2, mode_hz.shape)
        stuck_in_bark = any(abs(start_s - jab_s) < .013 for jab_s, *_ in JABS)
        t60_scale = (0.26 if stuck_in_bark else 0.91) * at_time(grip, start_s)
        handle = ringing(HANDLE_MODES, t, weight_db, t60_scale)
        add_strike(mix, start_s - graze_samples / SR, level_db + 1.5, drive, handle, lag_ms)
    return mix


def slab_blows(build_ms=3.023, contact_cycles=0.41):
    """Jabs, rebounds and bumps: a crunch builds and rings the slab modes near the favoured pitch."""
    # lighter bumps on the slab: start_s, level_db, favoured_hz
    bumps = [(0.614, -25, 254), (1.943, -26, 534), (2.037, -27, 523), (2.123, -28, 630), (2.521, -26, 360),
             (2.643, -16, 159), (2.766, -28, 254), (2.859, -25, 244), (2.996, -8.5, 500), (3.001, -13, 300),
             (3.074, -23, 425), (3.101, -16, 520), (3.118, -21, 436), (3.348, -30.5, 415),
             (3.708, -22, 440), (3.844, -27.5, 443), (4.033, -25, 700), (4.093, -18.5, 298),
             (4.247, -21, 444), (4.268, -26, 417), (4.76, -29, 258), (4.79, -28.5, 266), (4.85, -15.5, 680),
             (5.141, -25.5, 520), (5.579, -24, 700), (6.458, -34, 242), (6.582, -35, 425),
             (6.749, -28, 690), (6.882, -25, 382), (6.9, -16, 450), (6.904, -13.5, 413), (6.92, -18, 348),
             (7.611, -31, 269), (7.64, -29.5, 249), (7.903, -15.5, 700), (7.934, -17, 403),
             (8.005, -29.5, 143), (8.226, -30, 528), (8.378, -25.5, 423), (8.415, -10.5, 550),
             (8.437, -13, 278), (8.909, -31.5, 540), (9.444, -32, 570)]
    # deep log modes answer less as work goes on: time_s, gain_db
    deep_fade = [(0, 17), (3.2, 12.5), (4.2, -7), (9.69, -23)]
    mix, t = np.zeros((2, N)), np.arange(9000) / SR
    mode_hz = np.array(SLAB_MODES)[:, :1]
    # the slab is stiffer and deader while the blade presses
    pitch_excess, relax_ms, press_loss_db = 0.36, 3.7, -7
    relaxed = 1 - np.exp(-t * 1000 / relax_ms)
    stiffening = 1 + pitch_excess * relaxed * relax_ms / (t * 1000 + 1e-9)  # mean since contact
    build = t[:1500] * 1000 / build_ms
    blows = [(s, db, hz, 0.59) for s, db, hz, *_ in JABS]
    blows += [(s + after_ms / 1000, db, hz, 0.75) for s, _, _, after_ms, db, hz in JABS]
    blows += [(*bump, 1) for bump in bumps]
    for start_s, level_db, favoured_hz, t60_scale in blows:
        crunch = 0.11 * rng.standard_normal(1500) * build * np.exp(-build)
        crunch[round(build_ms * SR / 1000)] += 1
        push = np.sin(np.pi * np.minimum(t[:600] * favoured_hz / contact_cycles, 1)) ** 2
        drive = np.convolve(crunch, push)
        # the slab hangs differently at each blow
        detune = rng.normal(1, 0.04, mode_hz.shape)
        spread_db = rng.normal(0, 3.2, mode_hz.shape)
        # lower blows reach the deep modes better
        deep_db = -22.5 - 14 * np.log2(favoured_hz / 200) + at_time(deep_fade, start_s)
        upper_db = -9 * abs(np.log2(mode_hz * (1 + pitch_excess) / favoured_hz))
        weight_db = np.where(mode_hz < 105, deep_db, upper_db) + spread_db
        slab = ringing(SLAB_MODES, t, weight_db, t60_scale, detune * stiffening)
        slab *= amp(press_loss_db * relaxed)
        add_strike(mix, start_s - build_ms / 1000, level_db + 8, drive, slab, base_lag_ms=0.088)
    return mix


def scene():
    background = outdoor_air() + rustle()
    work = handle_knocks() + blade_rings() + bark_snaps() + slab_blows() + fibre_tears() + blade_slide()
    return background + work + wood_scatter(work)


def record(dry):
    """Two close capsules, each minus the delayed other; soft overload, then a band limit."""
    # body's colouring of the right capsule: freq_hz, gain_db
    shadow = [(1500, -2.5), (4000, 6.5), (8000, 0), (14000, 0)]
    # subtracted crossfeed: freq_hz, into_left_db, into_right_db
    crossfeed = [(1000, -.4, -.4), (3500, -.6, -.4), (4700, -2.5, -.5), (6500, -7, -3), (9000, -9, -7),
                 (14000, -9, -7)]
    # microphone response: freq_hz, gain_db
    mic_response = [(25, -30), (45, -10.5), (70, -8.5), (120, -1.5), (13500, -3), (14300, 2.5),
                    (14700, -41), (15200, -42), (16000, -60)]
    left, right = dry[0], filtered(dry[1], lambda hz: amp(at_hz(shadow, hz)))
    cross_hz, *sides_db = np.transpose(crossfeed)
    opposite = filtered(np.array([right, left]),
                        lambda hz: amp([np.interp(hz, cross_hz, db) for db in sides_db]))
    wide = np.array([left, right]) - delayed(opposite, delay_ms=0.4477)
    wide = filtered(wide, lambda hz: amp(at_hz(mic_response, hz)))
    limited = wide / (1 + abs(wide) ** 6) ** (1 / 6)
    lowpass = signal.firwin(511, cutoff=16300, window=("kaiser", 9), fs=SR)
    return signal.oaconvolve(limited, lowpass[None], "same")


dry = scene()
out = record(dry)
materialize(out)
```